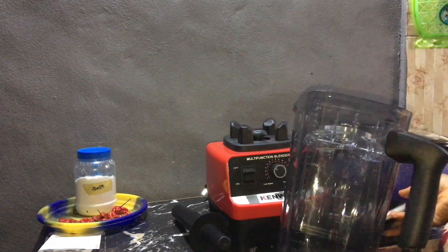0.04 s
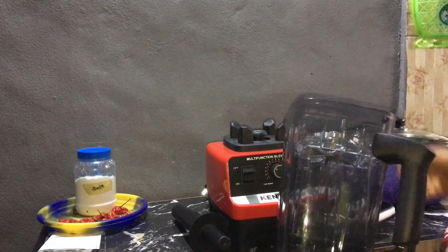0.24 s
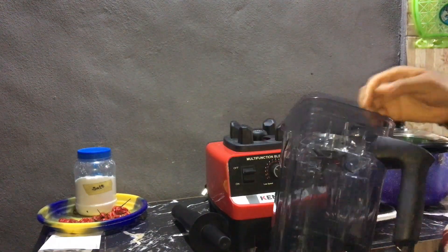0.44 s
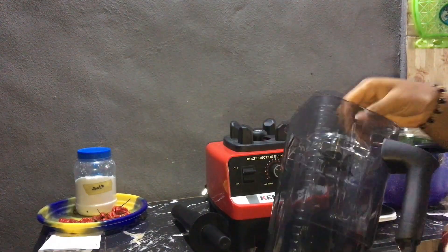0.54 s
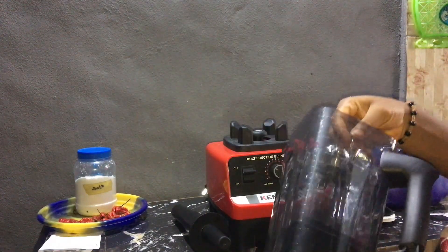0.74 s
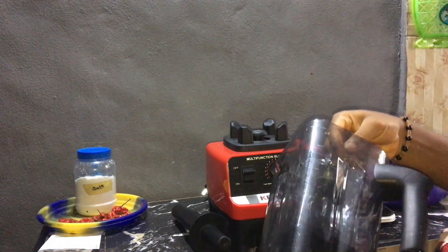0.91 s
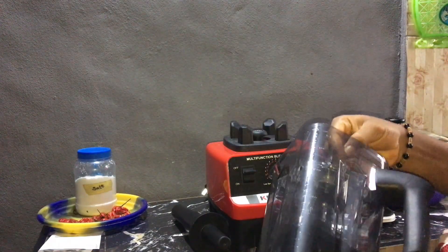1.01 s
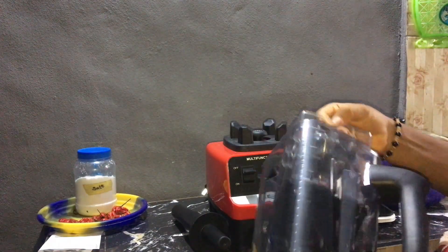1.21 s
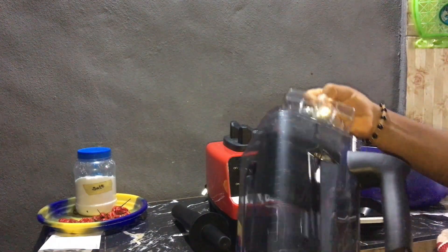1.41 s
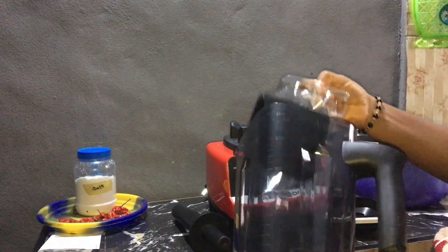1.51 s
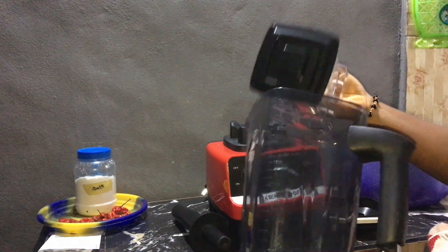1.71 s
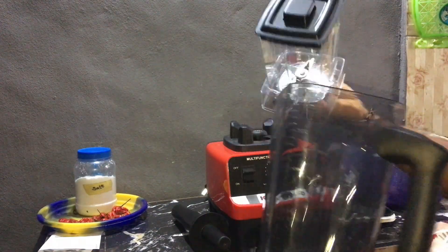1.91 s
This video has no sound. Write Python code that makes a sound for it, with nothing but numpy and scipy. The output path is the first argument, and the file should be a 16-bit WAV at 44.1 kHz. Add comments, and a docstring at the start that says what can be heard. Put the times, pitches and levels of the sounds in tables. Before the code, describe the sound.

A plastic blender jug drags and thuds down, then its tight lid snaps and judders loose

```python
"""A plastic blender jug drags over a table with a hollow hum and knocks down; then its lid is pulled off.
Random tiny slips, coloured by band filters, make the rub, the hiss and the lid's scrape; a wavering sine hums.
Contacts are snaps with short noise rattles; the jug, the cap and the lid sound in decaying modes when struck.
The lid snaps loose, clatters and judders out of the jug's mouth with low groans and short squeaks, which are
swelling, sagging tones. A small, hard-walled room answers with noise reverberation, over a low room tone."""
import sys
import numpy as np
from scipy import signal
from scipy.io import wavfile

SR = 44100
rng = np.random.default_rng(int(sys.argv[2]) if len(sys.argv) > 2 else 0)


def wav_out(sig):
    """Save sig, one row per channel (or a flat mono array), as 16-bit PCM at SR to the path in sys.argv[1]."""
    wavfile.write(sys.argv[1], SR, np.round(np.clip(np.atleast_2d(sig).T, -1, 1) * 32767).astype(np.int16))


N = 85995
TIME = np.arange(N) / SR
EDGES_HZ = 22 * 2 ** np.arange(0, 9.7, .4)  # band edges, 0.4 octave apart
SLIPS_PER_S, SLIP_SPREAD_DB = 900, 1.5
LOW_CUT_HZ = 163
RING_WAVER = .014  # spread of the trembling, as a share of the pitch


def from_db(db):
    """Decibels to gain."""
    return 10 ** (np.asarray(db) / 20)


def rms_one(x):
    """Scale to unit RMS level."""
    return x / np.sqrt(np.mean(x ** 2))


def at_hz(points, hz, axis=1):
    """Read a column of a table on a log-frequency axis."""
    points = np.array(points)
    return np.interp(np.log(hz), np.log(points[:, 0]), points[:, axis])


def level(curve):
    """Gain over time from (time [s], level [dB]) points; the end values hold."""
    return from_db(np.interp(TIME, *np.transpose(curve)))


def dying(t, t60):
    """Exponential decay from 1, falling 60 dB in t60 seconds."""
    return np.exp(-np.log(1000) * np.maximum(t, 0) / t60)


def drift(rate):
    """Random wander with spread 1, joining `rate` random points per second."""
    return np.interp(TIME * rate, np.arange(1000), rng.standard_normal(1000))


def wavering(hz, waver):
    """A sine whose pitch trembles by a random share."""
    pitch = hz * (1 + waver * drift(113))
    return np.sin(2 * np.pi * np.cumsum(pitch) / SR)


def bands():
    """Centre, share of the full bandwidth and filter of each band."""
    for low, high in zip(EDGES_HZ, EDGES_HZ[1:]):
        sos = signal.butter(2, [low, high], "band", fs=SR, output="sos")
        yield np.sqrt(low * high), (high - low) / (SR / 2), sos


def coloured(x, spectrum):
    """Weight the bands of a sound by a spectrum, in alternating sign; unit RMS level."""
    out = np.zeros(N)
    for k, (hz, _, sos) in enumerate(bands()):
        out += (-1) ** k * from_db(at_hz(spectrum, hz)) * signal.sosfilt(sos, x)
    return rms_one(out)


def ring(clicks, hz, t60):
    """A resonator: a unit click starts a decaying sine of height 1."""
    r, w = dying(1 / SR, t60), 2 * np.pi * hz / SR
    return signal.lfilter([0, np.sin(w)], [1, -2 * r * np.cos(w), r * r], clicks + 1e-18)


def add(out, s, sound):
    """Mix a sound in at a time."""
    start = int(s * SR)
    out[start:start + len(sound)] += sound[:N - start]


def slips(per_s=SLIPS_PER_S):
    """Friction as tiny clicks at random times, of uneven size and random sign."""
    sizes = from_db(SLIP_SPREAD_DB * np.minimum(rng.exponential(1, N), 4))
    signs = rng.choice([-1, 1], N)
    return sizes * signs * (rng.random(N) < per_s / SR)


def thin_walled(x):
    """Small plastic parts radiate no deep bass."""
    return signal.sosfilt(signal.butter(4, LOW_CUT_HZ, "high", fs=SR, output="sos"), x)


def struck(knocks, modes):
    """Every knock sounds the modes of a body; each mode's pitch trembles at random, blurring its decay."""
    out = np.zeros(N)
    for s, knock_db in knocks:
        for k, (hz, db, t60) in enumerate(modes):
            tone = dying(TIME, t60) * wavering(hz, RING_WAVER)
            add(out, s, (-1) ** k * from_db(knock_db + db) * tone)
    return out


# The jug's drag over the table: (time [s], level [dB])
DRAG_LEVEL = [(0, -23), (.08, -38), (.14, -31), (.36, -32), (.45, -28.5), (.6, -24.5), (.79, -23.5),
              (.87, -31), (1.12, -39)]
# Tone of the drag: (frequency [Hz], relative level per Hz [dB])
DRAG_COLOUR = [(60, -11), (120, 8.5), (170, 3), (450, -0.5), (700, -17), (1300, -22), (2300, -16.5),
               (5000, -41.5), (9000, -54), (15000, -64.5)]


def jug_drag():
    """Slips between jug and table shake the jug."""
    return level(DRAG_LEVEL) * coloured(slips(), DRAG_COLOUR)


# The jug's foot sliding on the table top: (time [s], level before the resonance joins [dB])
FOOT_LEVEL = [(0, -35.5), (.085, -53.5), (.125, -43), (.2, -55.5), (.3, -49.5), (.42, -66), (.73, -45.5),
              (.755, -43), (.80, -39.5), (.83, -83)]
# Tone of the hiss: (frequency [Hz], relative level per Hz [dB])
FOOT_COLOUR = [(800, 6.5), (2000, -10.5), (2900, 0.5), (4200, -11.5), (5500, 0.5), (7500, -25),
               (15000, -49.5)]
FOOT_SLIPS_PER_S = 220
FOOT_RING_HZ, FOOT_RING_T60_S, FOOT_RING_DB = 2460, 0.0099, 5  # level relative to the hiss


def foot_hiss():
    """The sliding foot makes a grainy hiss with one bright, short resonance."""
    hiss = coloured(slips(FOOT_SLIPS_PER_S), FOOT_COLOUR)
    resonance = rms_one(ring(slips(), FOOT_RING_HZ, FOOT_RING_T60_S))
    return level(FOOT_LEVEL) * (hiss + from_db(FOOT_RING_DB) * resonance)


# The hollow jug's hum: (time [s], level before HUM_DB is added [dB])
HUM_LEVEL = [(0.0, -24.5), (0.06, -28.5), (0.088, -40.5), (0.266, -20.5), (0.306, -21), (0.366, -42),
             (0.412, -22), (0.444, -33.5), (0.558, -19), (0.714, -31.5), (0.802, -14.5), (0.908, -23),
             (0.966, -46), (1.0, -34)]
HUM_HZ, HUM_WAVER, HUM_DB, HUM_T60_S = 222.4, 0.025, 2, 0.53  # waver as a share of the pitch


def jug_hum():
    """Dragging keeps a low mode of the hollow jug sounding; it dies away after the last level point."""
    dying_away = dying(TIME - HUM_LEVEL[-1][0], HUM_T60_S)
    return from_db(HUM_DB) * level(HUM_LEVEL) * dying_away * wavering(HUM_HZ, HUM_WAVER)


# Tone of the idle room: (frequency [Hz], relative level per Hz [dB])
ROOM_TONE_COLOUR = [(25, -31), (40, -41), (56, 17), (85, 2), (120, 8), (330, -31), (4000, -27),
                    (16000, -38)]
ROOM_TONE_DB = -42.5


def room_tone():
    """A steady, low bed of coloured noise."""
    return from_db(ROOM_TONE_DB) * coloured(rng.standard_normal(N), ROOM_TONE_COLOUR)


# Plastic meeting plastic:
# (time [s], bass [dB], middle [dB], clack [dB], tick [dB]), all relative levels
CONTACTS = [(0.409, -19.5, -26, -31, -49), (0.532, -21.5, -23.5, -26, -49), (0.607, -48, -13, -24, -37.5),
            (0.747, -14.5, -21, -19, -38), (0.804, -29, -8, -13, -36), (1.096, -11.5, -6.5, -10, -20),
            (1.100, -20.5, -15, -6.5, -40), (1.131, -10.5, -4, -12.5, -25.5), (1.152, -15.5, -17, -10, -19),
            (1.155, -11, -13, -30.5, -37), (1.177, -40, -27, -22, -45), (1.267, -28, -15, -35, -51),
            (1.300, -23.5, -34, -23, -38), (1.332, -18, -27, -24, -38.5), (1.342, -11.5, -26, -21.5, -48),
            (1.433, -30, -13, -17, -32.5), (1.458, -9.5, -24.5, -20.5, -42.5),
            (1.480, -40, -36, -20.5, -57.5), (1.616, -24, -23, -29, -43)]
# Where those four levels apply: bass, middle, clack, tick (frequency [Hz])
CONTACT_HZ = (280, 950, 2400, 6500)
# Tone common to all contacts: (frequency [Hz], relative level [dB])
PLASTIC = [(100, -23), (160, -16), (250, 4), (500, 2), (850, -5.5), (2800, 0), (7000, -7.5), (15000, -26)]
CONTACT_DB, CONTACT_T60_S = 14.5, 0.047
SNAP_SHARE = 0.43  # height of the snap against a rattle of unit energy


def contacts():
    """Each contact is a snap and a dense, quickly damped rattle of the plastic walls."""
    t = TIME[:SR // 8]
    rattles = rng.standard_normal((len(CONTACTS), len(t))) * dying(t, CONTACT_T60_S)
    rattles /= np.linalg.norm(rattles, axis=1, keepdims=True)
    rattles[:, 0] += SNAP_SHARE
    out = np.zeros(N)
    for k, (hz, _, sos) in enumerate(bands()):
        if hz <= PLASTIC[0][0]:
            continue  # skip bands below the lowest point of the tone
        for (s, *dbs), part in zip(CONTACTS, signal.sosfilt(sos, rattles)):
            own_db = np.interp(np.log(hz), np.log(CONTACT_HZ), dbs)
            gain = from_db(CONTACT_DB + at_hz(PLASTIC, hz) + own_db)
            add(out, s, (-1) ** k * gain * part / np.linalg.norm(part))
    return thin_walled(out)


# The jug knocking on the table: (time [s], relative level [dB])
JUG_KNOCKS = [(0.607, -23), (0.804, 0.5)]
# Modes of the jug: (frequency [Hz], relative level [dB], t60 [s])
JUG_MODES = [(272.2, -21.5, 0.54), (356, -15, 0.54), (444.4, -10, 0.11), (479, -19, 0.39), (539, -24, 0.63),
             (805, -13.5, 0.36), (887, -19, 0.38), (1010, -26.5, 0.23), (1078, -26, 0.79),
             (1174, -19, 0.35), (1220, -17.5, 0.35), (1253, -4, 0.045), (1320, -24, 0.14)]


def jug_knocks():
    """The jug touches the table faintly, then knocks down hard, sounding its body modes."""
    return struck(JUG_KNOCKS, JUG_MODES)


# The small cap in the lid clicking: (time [s], relative level [dB])
CAP_CLICKS = [(0.607, -24.5), (0.628, -32)]
# Modes of the cap: (frequency [Hz], relative level [dB], t60 [s])
CAP_MODES = [(1200, -7, .05), (3170, -1, .036), (3520, -1, .028), (4150, -7, .014), (6300, -12, .016),
             (6750, -9, .016)]


def cap_clicks():
    """The small cap clicks as it is gripped, sounding high, short modes."""
    return struck(CAP_CLICKS, CAP_MODES)


# The lid scraping along the rim: (time [s], level before the bass cut [dB])
SCRAPE_LEVEL = [(1.09, -96), (1.11, -38), (1.18, -15.5), (1.24, -42.5), (1.32, -23), (1.37, -15.5),
                (1.45, -39.5), (1.66, -39), (1.75, -60)]
# Tone of the scrape: (frequency [Hz], relative level per Hz [dB])
SCRAPE_COLOUR = [(200, -0.5), (550, 6), (850, -6.5), (1600, -8.5), (2200, -9.5), (2900, -21.5),
                 (6000, -37.5), (14000, -73)]


def lid_scrape():
    """Slips between lid and rim sound through the thin plastic."""
    return thin_walled(level(SCRAPE_LEVEL) * coloured(slips(), SCRAPE_COLOUR))


# The lid snapping loose and striking the rim: (time [s], relative level [dB])
LID_KNOCKS = [(1.097, -10.5), (1.154, -3.5)]
# Modes of the lid strikes: (frequency [Hz], relative level [dB], t60 [s])
LID_MODES = [(277.1, -23, 0.98), (350.4, -17.5, 1), (431, -17, 0.67), (481, -16, 0.94), (522, -9.5, 0.9),
             (601.2, -10, 0.51), (693.7, -11.5, 0.54), (876, -23, 1), (931, -22, 0.69), (977, -26.5, 1),
             (1930, -17, 0.43), (2047, -13.5, 0.12), (2190, -16.5, 0.33), (3255, -17.5, 0.08),
             (3580, -20, 0.099)]


def lid_knocks():
    """The lid snaps loose and strikes the rim, sounding long low modes and shorter high ones."""
    return struck(LID_KNOCKS, LID_MODES)


# The lid sticking and slipping in the jug's mouth, low groans and short squeaks:
# (time [s], length before the release [s], mid-groan pitch [Hz], level before flutter and bass cut [dB])
GROANS = [(1.098, 0.051, 258.5, -12.5), (1.263, .008, 1138, -15), (1.328, 0.041, 1466, -23.5),
          (1.336, 0.03, 258.9, -10.5), (1.349, 0.045, 394.3, -10.5), (1.362, .075, 498.4, -17),
          (1.39, .06, 283.7, -14), (1.42, 0.018, 1601, -19.5), (1.429, 0.019, 383.5, -8.5),
          (1.453, 0.012, 371, -2.5), (1.491, 0.037, 299.7, -6.5), (1.538, 0.023, 380, -13),
          (1.616, 0.042, 391, -16.5), (1.668, 0.033, 495.2, -28), (1.763, 0.078, 303, -29.5)]
GROAN_RISE_S, GROAN_T60_S, GROAN_FLUTTER_DB = 0.0081, 0.057, 1.5
GROAN_WAVER, GROAN_SAG_PER_S = .03, 0.36  # shares of the pitch
GROAN_TAIL_DB, GROAN_TAIL_CYCLES = -17.5, 136  # the tail falls 60 dB in this many cycles


def groans():
    """Slipping plastic makes tones that swell and sag, then drop to a faint, slower tail at their own pitch."""
    out = np.zeros(N)
    for s, length, hz, db in GROANS:
        pitch = hz * (1 - GROAN_SAG_PER_S * (np.minimum(TIME, length) - length / 2))
        after = TIME - length
        drop = dying(after, GROAN_T60_S)
        tail = from_db(GROAN_TAIL_DB) * dying(after, GROAN_TAIL_CYCLES / hz)
        swell = np.minimum(TIME / GROAN_RISE_S, 1) * np.maximum(drop, tail)
        flutter = from_db(db + GROAN_FLUTTER_DB * drift(80))
        add(out, s, flutter * swell * wavering(pitch, GROAN_WAVER))
    return thin_walled(out)


# The hard-walled room: (frequency [Hz], t60 [s], relative level of the reverberation [dB])
ROOM = [(121, 1, -12.5), (366, 0.5, -0.5), (1000, 0.8, 3), (2500, 0.45, -4.5), (6000, 0.43, -2),
        (14000, .3, -2.5)]
ROOM_BUILD_S = 0.014


def room(x):
    """Diffuse reverberation: a noise tail that builds quickly and dies at each band's own pace."""
    t = TIME[:SR]
    white = rng.standard_normal((2, SR))  # neighbouring bands use separate noises
    tail = np.zeros(SR)
    for k, (hz, share, sos) in enumerate(bands()):
        shape = np.minimum(t / ROOM_BUILD_S, 1) * dying(t, at_hz(ROOM, hz))
        part = signal.sosfilt(sos, white[k % 2] * shape)
        tail += from_db(at_hz(ROOM, hz, axis=2)) * np.sqrt(share) * part / np.linalg.norm(part)
    return signal.fftconvolve(x, tail)[:N]


GROAN_ROOM_DB, STRUCK_ROOM_DB = -4.5, -9.5  # sends to the room


def scene():
    """Jug and lid in the room, over the room tone; the hum stays dry."""
    clatter = jug_drag() + foot_hiss() + contacts() + cap_clicks() + lid_scrape()
    knocks = jug_knocks() + lid_knocks()
    hollow = groans()
    wet = room(clatter + from_db(GROAN_ROOM_DB) * hollow + from_db(STRUCK_ROOM_DB) * knocks)
    return (clatter + knocks + hollow + jug_hum() + wet + room_tone())[None]


RUMBLE_CUT_HZ, CUTOFF_HZ = 48, 16500
DIP_HZ, DIP_WIDTH_HZ, DIP_DB = 2605, 490, -5.5
CEILING = 1.05  # amplitude that rounded peaks approach


def record(dry):
    """The microphone loses the lowest rumble and dips in the treble; peaks are rounded, the top is cut."""
    rumble_cut = signal.butter(2, RUMBLE_CUT_HZ, "high", fs=SR, output="sos")
    heard = signal.sosfilt(rumble_cut, dry)
    dip_band = signal.lfilter(*signal.iirpeak(DIP_HZ, DIP_HZ / DIP_WIDTH_HZ, fs=SR), heard)
    heard = heard - (1 - from_db(DIP_DB)) * dip_band
    rounded = heard / (1 + (heard / CEILING) ** 6) ** (1 / 6)
    top_cut = signal.ellip(10, .2, 80, CUTOFF_HZ, fs=SR, output="sos")
    return signal.sosfilt(top_cut, rounded)


dry = scene()
out = record(dry)
wav_out(out)
```